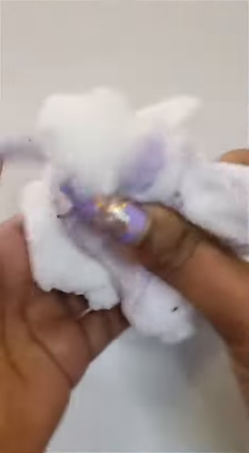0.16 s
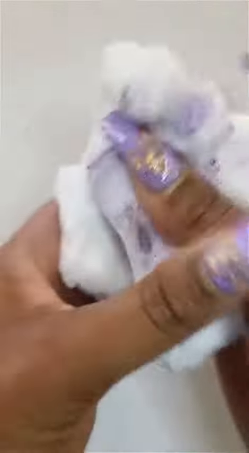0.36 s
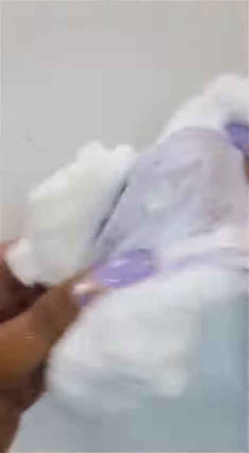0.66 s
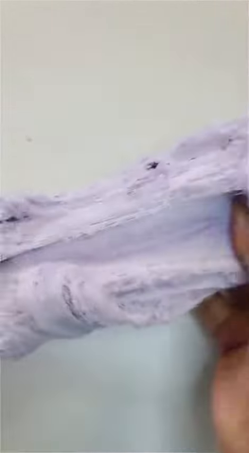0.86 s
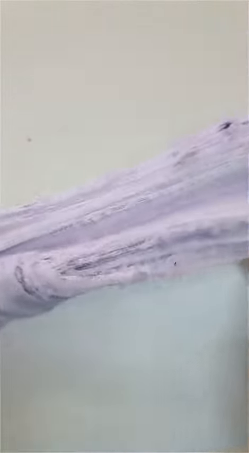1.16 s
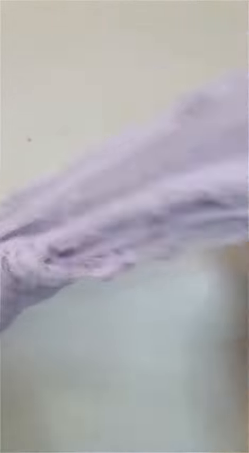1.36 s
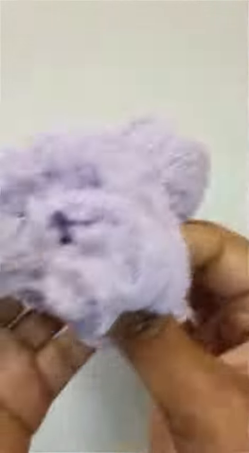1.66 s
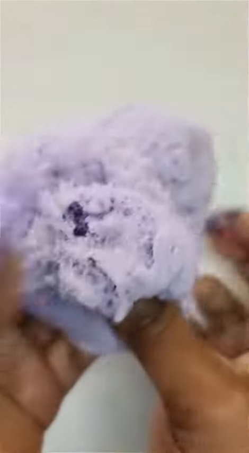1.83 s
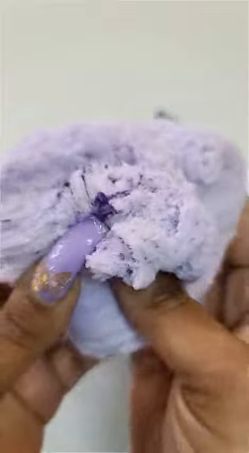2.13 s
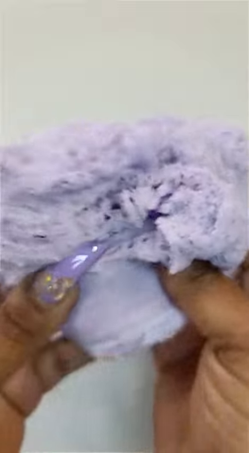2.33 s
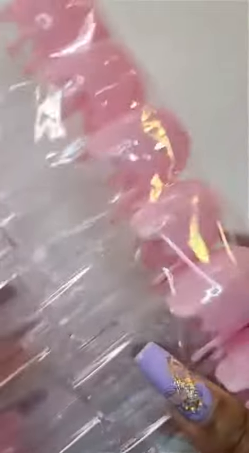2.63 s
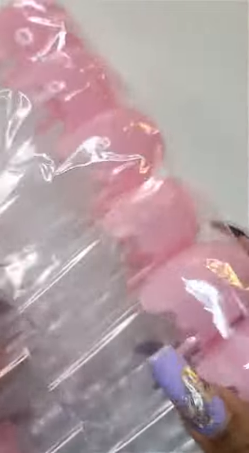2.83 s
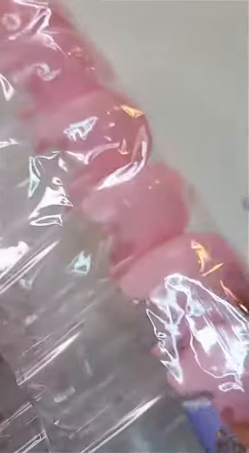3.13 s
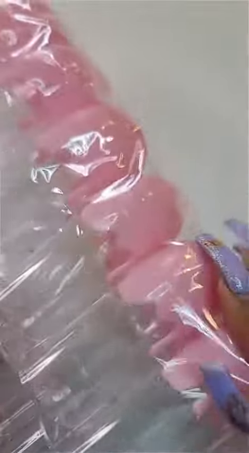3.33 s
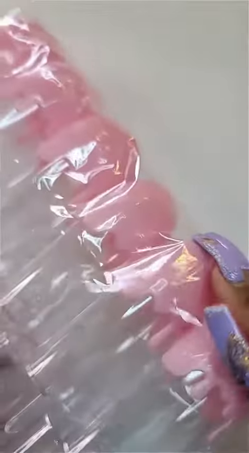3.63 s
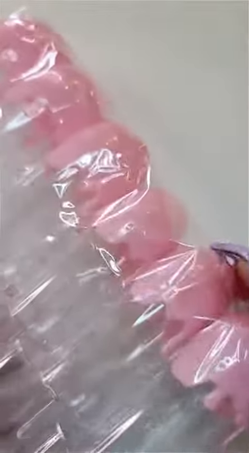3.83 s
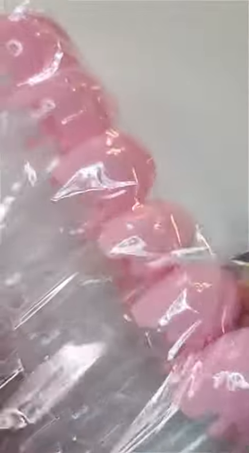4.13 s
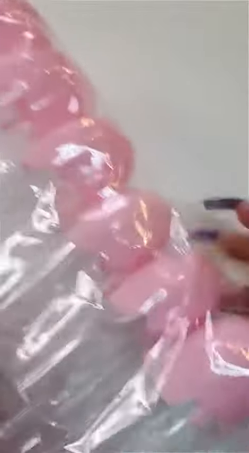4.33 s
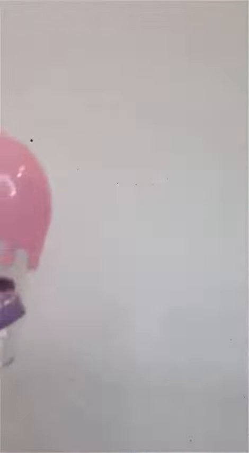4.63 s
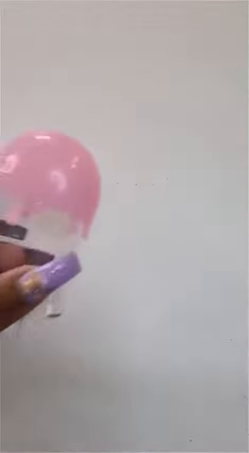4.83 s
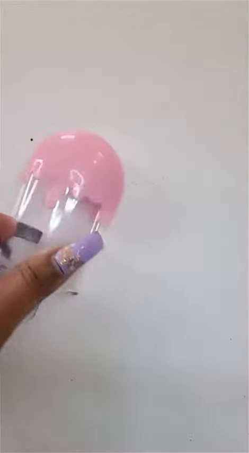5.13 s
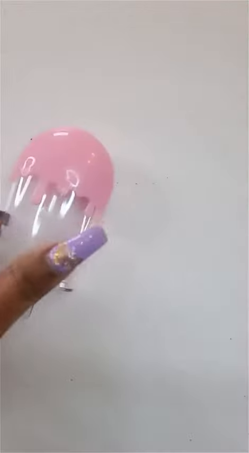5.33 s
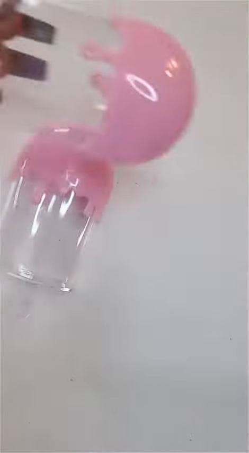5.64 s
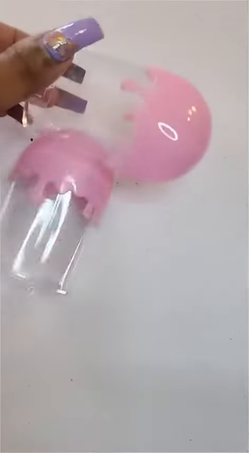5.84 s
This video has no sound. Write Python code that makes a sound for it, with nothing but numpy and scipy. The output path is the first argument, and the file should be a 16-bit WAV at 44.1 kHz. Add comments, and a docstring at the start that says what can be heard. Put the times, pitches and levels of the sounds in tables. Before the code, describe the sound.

Close microphone indoors, low room hum and faint hand rumble. Slime stretching stays very soft, under three small groups of distant dry clacks. Then about two seconds of dense, bright plastic film crinkling dominate, uneven with each squeeze, with sharp single snaps, a tiny rough squeal and dull bumps. After a short drop in level come nail ticks, hollow tub knocks with a light table thump, quiet handling, and one final knock.

```python
"""In a small room, close by, hands stretch soft cloud slime: tearing air cells fizz faintly, pockets pop.
Meanwhile the slime is slapped in the hands in three groups, bursts of noise with a low thud and a strong share
of room. Then fingers work at the cellophane around a pack of plastic tubs: buckling creases crackle and snap, a
stick-slip tone squeaks once, and dull bumps sound. Last, the hollow tubs, made of decaying modes, click against
long nails, are set down and slide on a table. Room hum and the rumble of hands lie beneath."""
import sys
import numpy as np
from scipy import signal
from scipy.io import wavfile
from scipy.ndimage import uniform_filter1d

SR = 44100
rng = np.random.default_rng(int(sys.argv[2]) if len(sys.argv) > 2 else 0)


def inscribe(sig):
    """Save sig as 16-bit PCM at rate SR to the path in sys.argv[1].

    A 1-D sig is mono; a 2-D sig holds one channel per row.
    Samples are clipped to [-1, 1] before scaling.
    """
    pcm = np.round(np.clip(np.atleast_2d(sig).T, -1, 1) * 32767)
    wavfile.write(sys.argv[1], SR, pcm.astype(np.int16))


N = 264159
TIME = np.arange(N) / SR

# Spectrum radiated by the cellophane: (frequency [Hz], level [dB])
FILM_SPECTRUM = [(29, -50), (50, -22.5), (87, -14.5), (180, -12.5), (601, -2.5), (765, -10), (905, -2.5),
                 (1700, -7), (2490, -1), (3030, 2.5), (3500, -0.5), (4900, 0.5), (8140, -5.5),
                 (13200, -4.5), (16000, -8.5)]
# The film rustles as long as the pack is held: (time [s], held for [s], resting effort [dB])
PACK_HOLD = (2.38, 2.145, -47)
# Spectrum of a hard edge on a tub or the table: (frequency [Hz], level [dB])
EDGE_SPECTRUM = [(200, -31.5), (700, -13.5), (1600, -0.5), (3600, 2.5), (5000, 7.5), (6300, -2.5),
                 (9000, -2), (16000, -17)]


def cellophane(rub_db=-11, rub_tilt_db=-1.84):
    """Buckling of a thin film: small creases crowd under effort, layers rub, large creases snap singly."""
    # The largest creases that buckle: (time [s], level before the trim in snap() [dB])
    large_creases = [(2.381, -16.5), (2.395, -19.5), (2.422, -14), (2.446, -19.5), (2.463, -14),
                     (2.475, -13.5), (2.604, -15), (2.736, -13.5), (2.795, -17), (2.825, -16),
                     (2.844, -13.5), (2.855, -16.5), (2.9836, -10), (3.008, -19), (3.087, -19.5),
                     (3.112, -21), (3.182, -15), (3.227, -18), (3.257, -19.5), (3.275, -21.5), (3.299, -24),
                     (3.31, -15), (3.353, -14), (3.383, -15.5), (3.396, -14), (3.429, -19.5),
                     (3.515, -15.5), (3.556, -18.5), (3.568, -18.5), (3.612, -21), (3.636, -22.5),
                     (3.655, -20.5), (3.676, -15), (3.697, -13.5), (3.782, -16.5), (3.881, -21),
                     (3.971, -15), (3.984, -15.5), (4.019, -10), (4.027, -17.5), (4.084, -12.5),
                     (4.142, -12), (4.226, -20), (4.422, -14), (4.48, -16), (4.494, -18.5)]
    effort_db = squeezing()
    clicks_per_s = 520 * amp(.7 * (effort_db + 32))
    trains = crackle(clicks_per_s, spread_db=5, count=48)
    small = sum(signal.oaconvolve(train, crease())[:N] for train in trains)
    worked = effort_db > PACK_HOLD[2]
    small /= np.sqrt(np.mean(small[worked] ** 2))
    grit = crackle(per_s=4600, spread_db=5.0, count=1)[0] * rng.standard_normal(N)
    rub = evened(colour(grit, FILM_SPECTRUM, rub_tilt_db))
    dry = (amp(-1.0) * small + amp(rub_db) * rub) * amp(effort_db)
    for s, db in large_creases + stray_snaps(effort_db):
        add(dry, s, snap(db))
    return dry + amp(-14) * room(dry)


def squeezing():
    """Work done on the film sets its sound: how hard the cellophane is worked, in dB."""
    # Squeezes of the cellophane: (time [s], held for [s], effort [dB])
    squeezes = [(2.385, 0.0059, -41), (2.467, 0.09, -32.5), (2.603, 0.064, -30.5), (2.661, 0.011, -22.5),
                (2.851, .165, -33), (3.06, 0.017, -31), (3.208, 0.063, -40), (3.327, 0.015, -34.5),
                (3.399, .12, -37), (3.697, 0.034, -21.5), (3.981, 0.086, -31.5), (4.095, .02, -23.5),
                (4.166, 0.059, -27.5), (4.313, 0.1, -27.5), (4.505, .015, -36)]
    # The fingers tighten, then the film settles
    return handling(PACK_HOLD, squeezes, rise_s=0.018, fall_s=0.018)


def crease(crack_s=0.00035, flutter_s=0.0011, flutter_db=-14, facet_hz=3800, facet_db=-9,
           facet_s=0.0017, tilt_spread_db=1.37, flip_s=.0008, bright_db=0):
    """Snap-through buckling: two quick flips, a flutter of the sheet and a brief ring of a random facet."""
    t = TIME[:SR // 40]
    late = t - flip_s * rng.uniform(.3, 1.5)
    first_flip = rng.uniform(0.1, 1.0) * np.exp(-t / crack_s)
    second_flip = (late > 0) * np.exp(-abs(late) / crack_s)
    flutter = amp(flutter_db) * np.exp(-t / flutter_s)
    burst = rng.standard_normal(len(t)) * (first_flip + second_flip + flutter)
    hz = min(facet_hz * np.exp(.6 * rng.normal()), SR / 3)
    facet = amp(facet_db) * np.sin(2 * np.pi * hz * t) * np.exp(-t / facet_s)
    tension = np.exp(0.036 * rng.normal())  # a tighter patch of film sounds higher
    spectrum = np.array(FILM_SPECTRUM) * [tension, 1]
    return struck(colour(burst + facet, spectrum, bright_db + tilt_spread_db * rng.normal()))


def snap(db, neighbour_db=-10, lag_s=.002):
    """Coupled buckling: a large crease cracks brightly and a neighbouring one gives way just after it."""
    sound = crease(crack_s=0.0003, flutter_s=0.0025, flutter_db=-14.5, facet_db=-10, bright_db=0.4)
    add(sound, lag_s * rng.uniform(.2, 1), amp(neighbour_db) * crease())
    return amp(db - 3.5) * sound


def stray_snaps(effort_db, over_db=7, follow=0.28, crowding=0.34, spread_db=2, count=56):
    """Chance buckling, more frequent and louder under a harder squeeze: rows (time [s], untrimmed dB)."""
    work = np.cumsum(amp(crowding * effort_db))
    share = (np.arange(count) + rng.random(count)) / count
    times = np.interp(share, work / work[-1], TIME)  # equal shares of the work between snaps, on average
    squeeze_db = np.interp(times, TIME, effort_db)
    usual_db = np.median(squeeze_db)
    scatter_db = spread_db * rng.standard_normal(count)
    levels_db = usual_db + over_db + follow * (squeeze_db - usual_db) + scatter_db
    return list(zip(times, levels_db))


def squeak(jitter=0.028, flutter=0.59):
    """Stick-slip friction: fast, uneven slips make a short rough squeal with weak overtones."""
    # A finger sticking and slipping on the film: (time [s], mean slip rate [Hz], level [dB])
    slips = [(2.64, 1250, -51.5), (2.655, 1800, -35.5), (2.672, 2050, -21.5), (2.682, 1915, -25),
             (2.69, 2600, -53)]
    waver, grip = (evened(uniform_filter1d(rng.standard_normal(N), size=60)) for _ in range(2))
    turns = np.cumsum(curve(slips) * (1 + jitter * waver)) / SR
    overtones = sum(amp(-10 * k) * np.sin(2 * np.pi * (k + 1) * turns) for k in range(4))
    tone = (1 + flutter * grip) * overtones
    sounding = (TIME > slips[0][0]) * (TIME < slips[-1][0])
    dry = evened(tone) * amp(curve(slips, column=2)) * sounding
    return dry + amp(-12.5) * room(dry, t60_scale=1.0)


def bumps(rattle_db=7, rattle_s=.005):
    """Impact excitation of modes: a long contact dulls the hollow tub; the rim chatters, the table thumps."""
    # Dull blows of a tub or the pack, set down or bumped, before the bass cut:
    # (time [s], level [dB], contact time constant [ms], thump of the table [dB])
    blows = [(2.668, -21.5, 0.13, -33.5), (2.85, -19.5, 0.031, -34), (3.558, -45, 0.38, -32.5),
             (3.597, -34.5, 0.17, -31), (4.995, -15.5, 0.91, -25), (5.017, -28.5, 0.12, -29),
             (5.06, -25, 0.84, -28), (5.079, -4.5, 0.13, -24.5), (5.186, -22, 0.61, -42),
             (5.272, -38, 0.083, -57), (5.381, -38, 0.18, -51.5), (5.431, -33.5, 0.47, -45.5),
             (5.44, -25.5, 0.59, -38), (5.904, -19, 0.16, -13), (5.968, -30, 0.93, -45)]
    # Hollow tub on the table top: (mean frequency [Hz], level [dB], t60 [s])
    hollow_modes = [(80, -31, 0.039), (125, -18, 0.038), (146, -16.5, 0.12), (227, -8, 0.13),
                    (288, -3, 0.039), (380, -8.5, 0.067), (512, 1.5, 0.024), (604, 0.5, 0.078),
                    (691, -2, 0.055), (822, 0, 0.032), (964, -7, 0.02), (1068, -8.5, 0.052),
                    (1348, 0.5, 0.025), (1560, -12, 0.025)]
    # Table top: (mean frequency [Hz], level [dB], t60 [s])
    table_modes = [(70.8, -2.5, 0.019), (114, 4, 0.059), (146, 1.5, 0.043), (246, -0.5, 0.036)]
    dry, t = np.zeros(N), TIME[:SR // 3]
    for s, db, contact_ms, thump_db in blows:
        force = t * np.exp(-t * 1000 / contact_ms)
        rattle = amp(rattle_db) * rng.standard_normal(len(t)) * np.exp(-t / rattle_s)
        body = ring(hollow_modes, detune=.008) + rattle
        body = signal.fftconvolve(body, force)[:len(t)]
        thump = struck(ring(table_modes, detune=0.027))
        add(dry, s, amp(db) * struck(body) + amp(thump_db) * thump)
    dry = colour(dry, [(30, -20.5), (60, -6.5), (110, -2.5)])  # small things radiate little deep bass
    return dry + amp(-9.5) * room(dry, t60_scale=1.0)


def ticks(scrape_s=0.0014):
    """Hard-edge impact: a noise crack plus wall modes, weaker in blows where the hand damps them."""
    # Hard clicks of nail or rim on a tub: (time [s], level [dB], brightness [dB per octave],
    # ring of the wall before a common 3 dB cut and the click's scaling [dB])
    clicks = [(4.688, -25, 13, -24), (4.7124, -21, 6, -9.5), (4.715, -30, 0.5, -24),
              (4.988, -32, -5.5, -32), (4.997, -35.5, -5, -28), (5.018, -29, -1, -21),
              (5.062, -35, -6, -19), (5.0802, -21, -3.5, -17), (5.101, -27, -0.5, -29),
              (5.188, -38, -4.5, -13), (5.229, -53, -0.5, -25.5), (5.273, -30.5, -12, -28),
              (5.388, -49, 1, -25), (5.8875, -37.5, 3.5, -9), (5.902, -23.5, -1, -1)]
    # Thin wall of a tub: (mean frequency [Hz], level [dB], t60 [s])
    wall_modes = [(1626, -5.5, 0.12), (2221, 1, 0.032), (3130, -16.5, 0.015), (3640, -11.5, 0.0094),
                  (4724, -5.5, 0.028), (6600, -26.5, 0.022), (7900, -20.5, .015), (10200, -7.5, 0.011),
                  (12800, -18.5, .015)]
    dry, t = np.zeros(N), TIME[:SR // 3]
    for s, db, tilt_db, ring_db in clicks:
        wall = amp(ring_db - 3.0) * ring(wall_modes, detune=0.008)
        crack = rng.standard_normal(len(t)) * np.exp(-t / scrape_s)
        add(dry, s, amp(db) * struck(colour(wall + crack, EDGE_SPECTRUM, tilt_db)))
    return dry + amp(-11.0) * room(dry, t60_scale=0.99)


def slides(tilt_db=-2.0):
    """Friction over asperities: the rim of a tub catches on the table top in a fine scrape."""
    # A tub slides on the table under the fingers: (time [s], held for [s], level [dB])
    strokes = [(5.0, .06, -53.5), (5.11, .11, -58.5)]
    grit = crackle(per_s=3000, spread_db=2, count=1)[0] * rng.standard_normal(N)
    level_db = gestures(strokes, rise_s=.004, fall_s=0.027)
    return evened(colour(grit, EDGE_SPECTRUM, tilt_db)) * amp(level_db)


def slime(pop_s=0.0021, tear_db=-2):
    """Rupture of air cells: tiny ones tear open as a fizz; larger pockets pop at their own pitch."""
    # Spectrum of the fizz: (frequency [Hz], level [dB])
    fizz_spectrum = [(100, -2.5), (300, -2), (600, -11.5), (900, -9), (1500, -1), (2100, -9), (3000, -3),
                     (3700, -3), (4800, 1), (8000, -5.5), (10500, -6), (13000, -4.5), (16000, -18)]
    # Larger air pockets that pop: (time [s], level [dB], pitch [Hz])
    pockets = [(1.408, -54, 1300), (1.411, -54.5, 5800), (1.437, -53.5, 1010), (1.469, -56, 3620),
               (1.509, -54, 2620), (1.551, -49.5, 1230), (1.561, -46.5, 2560), (1.59, -46.5, 1120),
               (1.596, -46, 2410)]
    tears = crackle(per_s=2800, spread_db=0.5, count=1)[0] * rng.standard_normal(N)
    fizz = colour(tears, fizz_spectrum)
    dry, t = evened(fizz) * amp(pulling() - 5.5), TIME[:SR // 60]
    for s, db, hz in pockets:
        pop = np.sin(2 * np.pi * hz * t) + amp(tear_db) * rng.standard_normal(len(t))
        add(dry, s, amp(db) * struck(pop * np.exp(-t / pop_s)))
    return dry + amp(-8) * room(dry)


def pulling():
    """Strain and relaxation set the sound: how hard the slime is pulled, in dB."""
    # It fizzes faintly as long as it is in the hands: (time [s], held for [s], resting effort [dB])
    slime_hold = (0, 2.35, -77.5)
    # Pulls and folds of the slime: (time [s], held for [s], effort [dB])
    pulls = [(0, 0.097, -66.5), (0.589, 0.14, -67), (.97, .12, -79.5), (1.41, .11, -66),
             (1.577, 0.011, -52), (1.73, .05, -74), (2.22, 0.13, -84.5)]
    # The slime takes up the strain, then relaxes
    return handling(slime_hold, pulls, rise_s=0.016, fall_s=0.023)


def slaps(decay_s=0.0019, thud_s=0.0049):
    """Slaps of the slime in the hands: short hard noise bursts with a low thud and a strong share of
    reverberation."""
    # Slaps of the slime in the hands: (time [s], level [dB], brightness [dB per octave], # low thud before a
    # common 2.5 dB cut [dB])
    blows = [(.308, -42, -10, -54), (.312, -26.5, -2, -34.5), (0.334, -39, -0.5, -31.5),
             (0.375, -42, -2.5, -48), (.893, -45.5, -6, -75), (0.913, -37, -4.5, -68),
             (0.926, -38, -3.5, -61), (2.0017, -28.5, 1.5, -36), (2.051, -32.5, -1, -37.5)]
    # Spectrum of the hard crack: (frequency [Hz], level [dB])
    crack_spectrum = [(200, -24), (700, -9), (1150, 3), (1650, -0.5), (2300, -7.5), (3000, -7.5),
                      (4200, -11), (7000, -20), (16000, -25)]
    # Spectrum of the low thud: (frequency [Hz], level [dB])
    thud_spectrum = [(60, -12), (150, -13.5), (240, -7), (450, -6.5), (700, -11.5), (1500, -40),
                     (5000, -61)]
    dry, t = np.zeros(N), TIME[:SR // 10]
    for s, db, tilt_db, thud_db in blows:
        crack, thud = rng.standard_normal((2, len(t)))
        crack = colour(crack * np.exp(-t / decay_s), crack_spectrum, tilt_db)
        thud = colour(thud * np.exp(-t / thud_s), thud_spectrum)
        add(dry, s, amp(db) * struck(crack))
        add(dry, s, amp(thud_db - 2.5) * struck(thud))
    return dry + amp(-3) * room(dry, t60_scale=0.81)


def ambience(floor_db=-71, slime_db=-5, pack_db=-56, pack_follow=0.34):
    """Filtered noise: steady room hum and hiss, and the rumble of hands that pull, squeeze and reach."""
    # Spectrum of the room's hum and hiss: (frequency [Hz], level [dB])
    hum_spectrum = [(15, -34), (25, -6), (92, -10.5), (170, -15.5), (335, -15.5), (607, -30.5),
                    (1160, -34.5), (2000, -38.5), (2220, -33), (3340, -57.5), (5570, -39.5), (12900, -38),
                    (16000, -36.5)]
    # The hands shift close by: (time [s], held for [s], rumble level [dB])
    reaches = [(.14, 0.18, -69.5), (.7, 0.045, -67), (1.24, 0.032, -72), (5.62, .25, -58)]
    rumble_spectrum = [(25, -18.5), (80, 7.0), (130, -5.5), (200, -13.0),
                       (400, -17.0), (1200, -34), (3000, -68.0)]  # (frequency [Hz], level [dB])
    hands = colour(rng.standard_normal(N), rumble_spectrum)
    grip = amp(pack_db + pack_follow * (squeezing() + 32.5))
    reach = amp(gestures(reaches, rise_s=0.032, fall_s=0.041))
    motion = amp(pulling() + slime_db) + grip + reach
    hum = colour(rng.standard_normal(N), hum_spectrum)
    return evened(hum) * amp(floor_db) + evened(hands) * motion


def room(x, t60_scale=1):
    """Reverberation: dense reflections of random sign, the treble dying first."""
    # Reverberation time before t60_scale: (frequency [Hz], t60 [s])
    decay_times = [(100, 0.3), (500, 0.36), (1500, 0.28), (5000, 0.2), (16000, 0.11)]
    t = TIME[:SR * 2 // 3]
    taps = rng.standard_normal(len(t)) * (rng.random(len(t)) < .15)
    hz, at, bands = signal.stft(taps, SR, nperseg=256)
    decay = amp(-60 * at / (t60_scale * read(decay_times, hz)[:, None]))
    tail = signal.istft(bands * decay, SR, nperseg=256)[1][:len(t)]
    tail *= np.clip((t - .002) / 0.0014, 0, 1)  # the first reflections need a moment to arrive
    return signal.oaconvolve(x, tail / np.linalg.norm(tail))[:N]


def ring(modes, detune):
    """Modal decay: damped sines, each a little different with the grip and the place of the blow."""
    t = TIME[:SR // 3]
    sound = np.zeros(len(t))
    for k, (hz, db, t60) in enumerate(modes):
        tone = np.sin(2 * np.pi * hz * (1 + detune * rng.normal()) * t)
        sound += (-1) ** k * amp(db) * tone * np.exp(-np.log(1000) * t / t60)
    return sound


def crackle(per_s, spread_db, count):
    """Random point process: several sparse trains of clicks, most of them small."""
    size = amp(spread_db * np.minimum(rng.exponential(1, N), 3))
    size *= rng.random(N) < per_s / SR
    local_power = np.maximum(uniform_filter1d(size ** 2, size=1100), 0)
    size /= np.sqrt(local_power + 0.00057)  # the work is shared among the clicks
    train = rng.integers(0, count, N)
    return [size * (train == k) for k in range(count)]


def gestures(rows, rise_s, fall_s):
    """Power addition: level in dB of hand movements that each swell, hold and die away."""
    power = 0
    for s, held, db in rows:
        before = np.maximum(s - TIME, 0) / rise_s
        after = np.maximum(TIME - s - held, 0) / fall_s
        power = power + amp(db) ** 2 * np.exp(-2 * (before + after))
    return 10 * np.log10(power + 1e-14)


def handling(held, rows, rise_s, fall_s):
    """Amplitude addition: effort in dB of a light steady hold plus movements, fading outside the hold."""
    s, length, rest_db = held
    in_hand_db = gestures([(s, length, 0)], rise_s=0.0017, fall_s=0.0017)  # taking hold and letting go
    return 20 * np.log10(amp(rest_db) + amp(gestures(rows, rise_s, fall_s))) + in_hand_db


def colour(x, points, tilt_db=0):
    """Minimum-phase filtering: a causal filter with the given spectrum, tilted in dB per octave."""
    hz = abs(np.fft.fftfreq(4096, 1 / SR))
    octaves = np.log2(np.maximum(hz, 200) / 2000)
    log_gain = np.log(amp(read(points, hz) + tilt_db * octaves))
    taps = np.fft.ifft(np.exp(np.conj(signal.hilbert(log_gain)))).real  # log gain fixes the phase
    return signal.oaconvolve(x, taps[:len(taps) // 2])[:len(x)]


def amp(db):
    """Decibel law: amplitude ratio of a level."""
    return 10 ** (np.asarray(db) / 20)


def evened(x):
    """Mean power: scales to rms 1."""
    return x / np.sqrt(np.mean(x ** 2) + 1e-20)


def struck(x):
    """Short-time power: scales a blow so that its loudest millisecond has rms 1."""
    return x / np.sqrt(uniform_filter1d(x ** 2, size=44).max())


def read(points, hz):
    """Logarithmic pitch scale: reads a spectrum on a log-frequency axis."""
    f, value = np.transpose(points)
    return np.interp(np.log(hz + 1), np.log(f), value)


def curve(rows, column=1):
    """Linear interpolation: reads a control at every sample."""
    rows = np.array(rows)
    return np.interp(TIME, rows[:, 0], rows[:, column])


def add(mix, s, sound):
    """Superposition: mixes a sound in at time s."""
    part = mix[round(s * SR):][:len(sound)]
    part += sound[:len(part)]


def scene():
    """Superposition of the pack, the tubs, the slime and its slaps over the sound of the room."""
    pack = cellophane() + squeak()
    tubs = bumps() + ticks() + slides()
    return (pack + tubs + slime() + slaps() + ambience())[None]


def record(dry):
    """Gain and band limiting: the level dips briefly three times, then a low-pass at 16 kHz."""
    # The level dips briefly: (centre time [s], length [s], depth [dB])
    dips = [(0.867, 0.044, 36), (4.57, 0.078, 46.5), (5.529, 0.076, 23.5)]
    dip_db = sum(depth * np.exp(-(2 * (TIME - s) / length) ** 4) for s, length, depth in dips)
    low_pass = signal.firwin(511, 16000, window=("kaiser", 8), fs=SR)
    return signal.oaconvolve(dry * amp(-dip_db), low_pass[None], "same")


dry = scene()
out = record(dry)
inscribe(out)
```